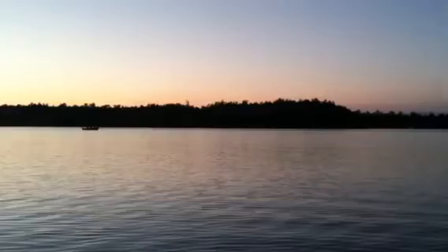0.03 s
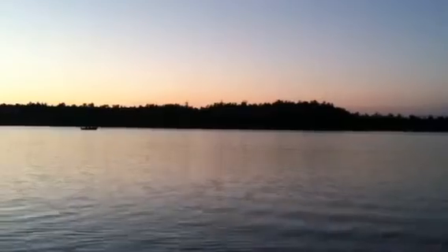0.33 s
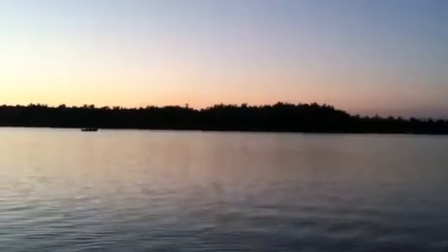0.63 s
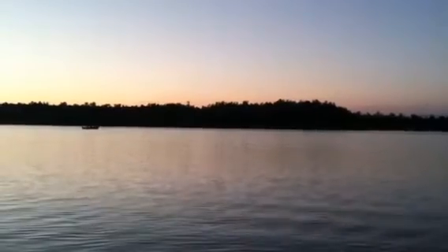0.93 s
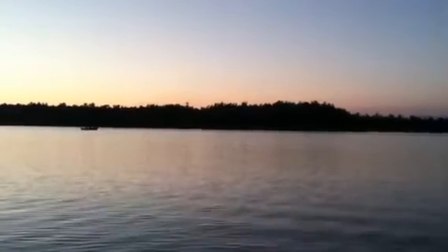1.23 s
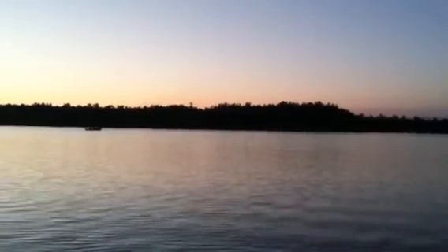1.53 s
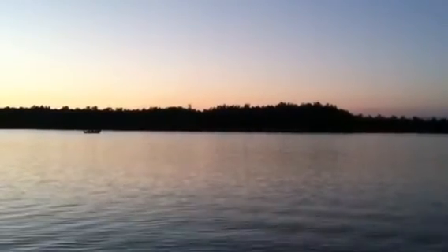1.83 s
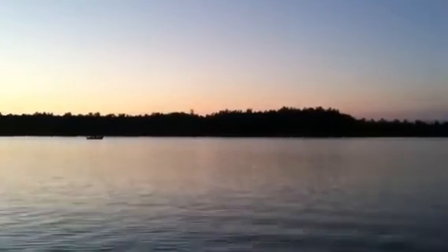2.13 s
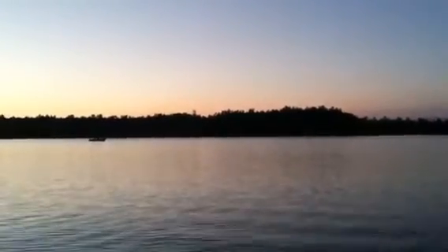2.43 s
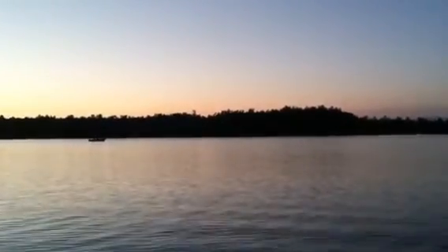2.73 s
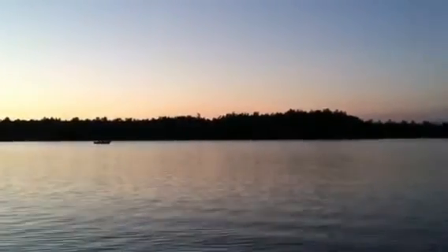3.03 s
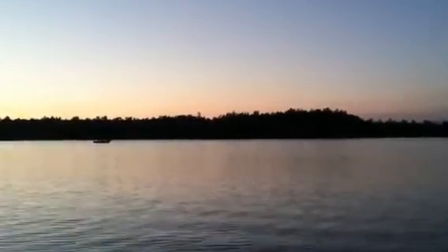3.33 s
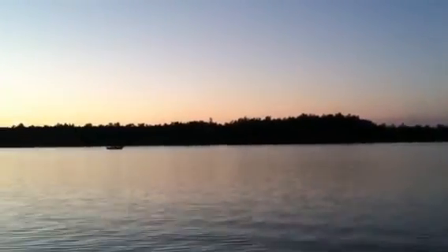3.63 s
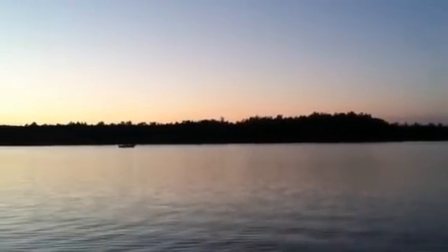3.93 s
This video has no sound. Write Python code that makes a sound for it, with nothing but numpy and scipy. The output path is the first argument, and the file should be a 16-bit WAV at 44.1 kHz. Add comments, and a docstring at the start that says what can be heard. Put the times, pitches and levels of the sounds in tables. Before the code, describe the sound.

Loons cry almost without pause across still water, their clear, quavering notes stepping up in pitch and trailing a faint echo. The lakeside is otherwise quiet, with light hiss and one sharp, close click late on.

```python
"""Loons on a lake at dusk

Two loons trade trembling calls across calm water, fainter loons answer from farther off, and the wooded shore
returns a long, faint echo. Each voice is a nearly pure tone that swings in pitch and loudness about ten times a
second and jumps between registers (pitch ranges). Under them lie a soft hiss, a low hum and two dull bumps.
Something small clicks close by, faintly at the start and clearly near the end."""
import sys
import numpy as np
from scipy import signal
from scipy.fft import rfft, irfft
from scipy.io import wavfile
from scipy.ndimage import uniform_filter1d

SR = 44100
rng = np.random.default_rng(int(sys.argv[2]) if len(sys.argv) > 2 else 0)


def unload_wav(signal):
    """Save mono or channel-first audio to the path in sys.argv[1] as 16-bit WAV at rate SR, clipped to [-1, 1]."""
    wavfile.write(
        sys.argv[1],
        SR,
        np.round(np.clip(np.atleast_2d(signal).T, -1, 1) * 32767).astype(np.int16),
    )


N = 176400  # 4 seconds


def amp(db):
    """Turns decibels into a number to multiply by."""
    return 10 ** (np.asarray(db) / 20)


def unit(x):
    """Scales a signal to an average (rms) size of 1."""
    return x / np.sqrt(np.mean(x ** 2) + 1e-20)


def look_up(table, hz):
    """Reads between the rows of a table, on a log-frequency scale."""
    f, value = np.transpose(table)
    return np.interp(np.log(hz + 1), np.log(f), value)


def add(mix, start_s, sound):
    """Adds a sound to the mix at the given time."""
    part = mix[max(round(start_s * SR), 0):][:len(sound)]
    part += sound[:len(part)]


def decay(t, fade_s):
    """Dies away by 60 dB in the fade time."""
    return np.exp(-np.log(1000) * t / fade_s)


def noise(centre_hz, width_hz):
    """Noise in one smooth band; centred on zero, it is a random wander."""
    f = np.fft.rfftfreq(N, 1 / SR)
    band = np.exp(-2 * ((f - centre_hz) / width_hz) ** 2)
    return unit(irfft(rfft(rng.standard_normal(N)) * band, N))


# The hiss of still air, from low to high: f/Hz, relative level/dB
HISS_COLOUR = [(25, -14.5), (65, -17), (100, -5.5), (170, 1), (260, 0.5), (500, -2), (900, -1), (2000, -9),
               (3500, -11.5), (6000, -13), (8500, -18), (11000, -23), (15500, -27.5)]
HISS_DB, PATCH_DB = -69.5, 1.5
def air_hiss():
    """Still air hisses softly, with slightly louder and quieter patches drifting through it."""
    hz, _, spectrum = signal.stft(rng.standard_normal(N), SR, nperseg=1024, noverlap=768)
    patches = rng.standard_normal(spectrum.shape)
    for axis in (0, 1):  # smooth over frequency, then time
        patches = uniform_filter1d(patches, size=12, axis=axis)
    gain = amp(look_up(HISS_COLOUR, hz)[:, None] + PATCH_DB * unit(patches))
    _, hiss = signal.istft(spectrum * gain, SR, nperseg=1024, noverlap=768)
    return amp(HISS_DB) * unit(hiss[:N])


# The two tones of the hum: f/Hz, level/dB
HUM_TONES = [(96.7, -80.5), (145, -81.5)]
HUM_WAVER_DB = 1.2
def low_hum():
    """Two low tones waver a little in loudness and pitch."""
    out, t = np.zeros(N), np.arange(N) / SR
    for hz, db in HUM_TONES:
        level = amp(db + HUM_WAVER_DB * noise(0, width_hz=5))
        drift = .3 * noise(0, width_hz=3)
        out += np.sqrt(2) * level * np.sin(2 * np.pi * hz * t + drift)
    return out


# One row per stretch of voice in one register; a crest is the top of a swing:
# start t/s, end t/s, crest t/s, beat length t/s, crest f/Hz, swing f/Hz,
# crest level/dB, swing level/dB, overtone boost level/dB
CALLS = [ (.12, .14, .125, .1, 1040, 60, -52, -2, 6), (.14, .22, .153, .125, 1150, 190, -46.5, 13.5, 4),
         (.25, .305, .28, .12, 1210, 60, -66.5, 5.5, -7), (.305, .357, .31, .11, 785, 70, -54.5, 5.5, -1.5),
         (.358, .385, .4, .075, 950, 210, -51.5, 5, -8.5), (.387, .545, .408, .096, 1248, 270, -39, 17, -2),
         (.545, 1.04, .599, .095, 1520, 250, -42.2, 10.5, -4),
         (.93, .958, .972, .1, 860, 220, -49, 10, 11.5),
         (.958, 1.005, .955, .1, 1200, 130, -39.5, 10.5, 0.5),
         (1.005, 1.06, 1.075, .14, 1340, 270, -38, 9, 4), (1.055, 1.118, 1.09, .1, 1330, 100, -52, 4, -14),
         (1.062, 1.103, 1.067, .1, 1765, 220, -48, 21, 10),
         (1.115, 1.14, 1.155, .1, 1560, 330, -41.5, 1, -3.5),
         (1.125, 1.147, 1.12, .08, 740, 120, -62, 5.5, -14.5),
         (1.141, 1.385, 1.156, .092, 1775, 220, -44, 18.5, 5),
         (1.392, 1.43, 1.44, .1, 1530, 310, -40.5, 7, -4.5),
         (1.432, 1.474, 1.438, .1, 1755, 220, -49.5, 19, 12.5),
         (1.476, 1.505, 1.49, .1, 1170, 80, -50, 1.5, -12),
         (1.5, 1.573, 1.53, .12, 1005, 100, -50, 7, -3.5),
         (1.724, 1.763, 1.765, .1, 860, 90, -52.5, 4, 8.5),
         (1.765, 1.79, 1.745, .09, 1200, 190, -46, 6, -6.5),
         (1.79, 1.883, 1.836, .1, 1245, 240, -38, 19.5, -3),
         (1.885, 2.46, 1.932, .0925, 1532, 230, -39.7, 12, -4),
         (2.1, 2.22, 2.135, .1, 800, 80, -70, 7, -16.5), (2.25, 2.35, 2.33, .1, 1230, 230, -61.5, 6, -5),
         (2.35, 2.378, 2.39, .1, 830, 210, -49.5, 10.5, 9.5),
         (2.378, 2.425, 2.37, .1, 1190, 100, -40, 10, 1),
         (2.425, 2.527, 2.48, .097, 1500, 280, -40.5, 9, -5),
         (2.527, 2.572, 2.574, .096, 1530, 310, -40, 5, -5),
         (2.455, 2.51, 2.47, .13, 1235, 200, -54, 2, -3.5),
         (2.483, 2.508, 2.465, .08, 830, 190, -57.5, 4.5, -3.5),
         (2.574, 2.72, 2.582, .094, 1775, 200, -44.5, 19.5, 8.5),
         (2.729, 2.76, 2.766, .1, 1490, 290, -41, 3, -3),
         (2.762, 2.815, 2.769, .1, 1770, 220, -46.5, 19, 9.5),
         (2.821, 2.887, 2.869, .096, 1450, 260, -42, 7, -5),
         (2.877, 2.905, 2.88, .1, 1700, 150, -56.5, 3, 14),
         (2.912, 2.938, 2.915, .1, 1180, 60, -52, 8, -20.5),
         (2.938, 3.02, 2.97, .125, 990, 100, -48.5, 12, -5.5),
         (3.194, 3.224, 3.195, .1, 755, 60, -55, -0.5, -4),
         (3.23, 3.325, 3.278, .098, 1245, 260, -38.7, 18.5, -3),
         (3.325, 3.419, 3.373, .1, 1268, 260, -37.7, 14, -4),
         (3.42, 3.91, 3.467, .093, 1522, 220, -44.5, 8, 2), (3.595, 3.7, 3.7, .13, 800, 130, -68, 7, -8),
         (3.72, 3.88, 3.805, .098, 1270, 280, -62.5, 2, -4), (3.876, 3.911, 3.92, .11, 830, 200, -51, 6, 7),
         (3.912, 4.02, 4.005, .105, 1230, 250, -41, 9.5, 1.5),
         (3.915, 3.99, 3.96, .1, 1300, 80, -52.5, 5.5, 2)]
# How flat the loudness stays on a crest: crest f/Hz, flatness (bigger is flatter)
CREST_FLATNESS = [(1000, 1.2), (1250, 1.55), (1500, 1.1), (1780, 1.55)]
# How well the throat's resonances pass an overtone: f/Hz, relative level/dB
THROAT_COLOUR = [(1300, -3.5), (1650, -6.5), (1980, -25.5), (2280, -19.5), (2500, -33), (3040, -34.5),
                 (3540, -30.5), (3800, -39), (4500, -30.5), (5300, -33), (7000, -37), (9000, -42.5)]
SLOWING_PER_S = .095  # a long call beats more and more slowly
SAG_HZ, SAG_DB, SAG_S = 55, 3, .41  # and sinks, ever faster: this far, this long after its crest time
ATTACK_S, RELEASE_S = .009, .011  # a register starts abruptly and fades at the next jump
ARCH_SHAPE, LEAD_S = 1.22, .002  # pitch lingers on the crest; loudness runs slightly ahead of it
JITTER, SHIMMER_DB, WOBBLE_HZ = .004, .51, 250  # tiny random wobbles of pitch and loudness
OVERTONE_STEP_DB, FLUTTER_DB, FLUTTER_HZ = -6, 3, 90  # overtones weaken going up, and flicker
def loons():
    """Pitch and loudness rise and fall together on each beat; the throat passes a few weak overtones."""
    out = np.zeros(N + SR)
    jitter, shimmer = JITTER * noise(0, WOBBLE_HZ), SHIMMER_DB * noise(0, WOBBLE_HZ)
    flutter = FLUTTER_DB * np.array([noise(0, FLUTTER_HZ) for _ in range(5)])
    for start, end, crest, beat, top_hz, swing_hz, top_db, swing_db, boost_db in CALLS:
        samples = np.arange(round((start - ATTACK_S / 2) * SR), round((end + RELEASE_S / 2) * SR))
        t, at = samples / SR, samples % N
        age = t - crest
        pace = np.pi * (1 - SLOWING_PER_S * age) / beat
        pitch_dip = (np.sin(pace * age) ** 2) ** ARCH_SHAPE
        level_dip = (np.sin(pace * (age + LEAD_S)) ** 2) ** look_up(CREST_FLATNESS, top_hz)
        sag = (age / SAG_S) ** 3
        hz = (top_hz - swing_hz * pitch_dip - SAG_HZ * sag) * (1 + jitter[at])
        phase = 2 * np.pi * np.cumsum(hz) / SR
        voice = np.sin(phase)
        for k, flutter_db in enumerate(flutter[:, at], 2):
            overtone_db = look_up(THROAT_COLOUR, k * hz) + boost_db + OVERTONE_STEP_DB * (k - 2)
            voice += amp(overtone_db + flutter_db) * np.sin(k * phase)
        ramp = np.minimum((t - t[0]) / ATTACK_S, (t[-1] - t) / RELEASE_S)
        fade = np.sin(np.pi / 2 * np.clip(ramp, 0, 1)) ** 2
        level = amp(top_db - swing_db * level_dip - SAG_DB * sag + shimmer[at])
        add(out, t[0], np.sqrt(2) * fade * level * voice)
    return out[:N]


# Echoes from the water, the near bank and the far shore: delay t/s, build-up t/s, fade t/s, level/dB
LAKE_ECHOES = [(.002, .004, .12, -25), (.03, .08, 1.3, -22), (.68, .1, 1.9, -18)]
# How much of each frequency comes back: f/Hz, relative level/dB
ECHO_TONE = [(500, -5), (1000, -2), (1250, 0), (1520, -1), (1780, -10), (3000, -12), (8000, -22)]
def lake_echo(calls):
    """Blurred echoes return from the water and the wooded banks, dulled by distance."""
    t = np.arange(3 * SR) / SR
    tail = np.zeros(len(t))
    for delay, build, fade_s, db in LAKE_ECHOES:
        swell = np.clip((t - delay) / build, 0, 1)
        echo = rng.standard_normal(len(t)) * swell * decay(t, fade_s)
        tail += amp(db) * echo / np.linalg.norm(echo)
    colour = amp(look_up(ECHO_TONE, np.fft.rfftfreq(len(t), 1 / SR)))
    tail = irfft(rfft(tail) * colour, len(t))
    return signal.fftconvolve(calls, tail[:-SR // 2])[:N]


# When each click comes and how strong it is: t/s, level/dB
CLICK_HITS = [(.139, -65.5), (3.8408, -39.5)]
# The noisy part of a click, from low to high: f/Hz, relative level/dB
SNAP_COLOUR = [(500, -22), (2000, -3), (3500, -9.5), (5000, 1), (6500, -5), (8800, -1), (10500, -4),
               (13000, -19), (15500, -29)]
# The tones the object rings with: f/Hz, relative level/dB, fade t/s
RING_TONES = [(4253, 14, 0.067), (7149, -15, 0.082), (7677, -7, 0.076), (8129, -11, 0.17),
              (8576, -19, 0.091), (8888, -4, 0.049), (9690, -19, 0.1), (10020, -9, 0.092),
              (10980, -23, 0.12), (11460, -24, 0.067)]
SNAP_FADE_S, RATTLE_FADE_S, TAIL_FADE_S = .009, .065, .3
RATTLE_DB, TAIL_DB, RING_DB = -10, -39.5, -31.5  # compared with the snap
def clicks():
    """A small hard object snaps, rattles and rings briefly."""
    out, t = np.zeros(N), np.arange(SR // 2) / SR
    colour = amp(look_up(SNAP_COLOUR, np.fft.rfftfreq(len(t), 1 / SR)))
    rattle = amp(RATTLE_DB) * decay(t, RATTLE_FADE_S)
    shape = decay(t, SNAP_FADE_S) + rattle + amp(TAIL_DB) * decay(t, TAIL_FADE_S)
    ring = sum(amp(db) * decay(t, fade_s) * np.sin(2 * np.pi * hz * t) for hz, db, fade_s in RING_TONES)
    for start, db in CLICK_HITS:
        burst = unit(irfft(rfft(rng.standard_normal(len(t))) * colour, len(t)))
        add(out, start, amp(db) * (burst * shape + amp(RING_DB) * ring))
    return out


# Two bands of noise for each bump: middle t/s, half length t/s, centre f/Hz, width f/Hz, level/dB
BUMP_BANDS = [(1.185, .028, 105, 25, -67), (1.22, .08, 175, 90, -75), (1.56, .022, 200, 130, -71),
              (1.56, .022, 450, 70, -76)]
def bumps():
    """Low noise swells and fades quickly, making dull, soft-edged bumps."""
    t = np.arange(N) / SR
    return sum(amp(db) * np.exp(-((t - middle) / half) ** 2) * noise(hz, width)
               for middle, half, hz, width, db in BUMP_BANDS)


def scene():
    """The birds and their echo over the quiet lakeside, in one channel."""
    calls = loons()
    return (calls + lake_echo(calls) + air_hiss() + low_hum() + clicks() + bumps())[None]


START_S, CUT_HZ = .12, 15700
def record(dry):
    """The sound begins after a moment of silence, and the highest treble is cut off."""
    live = dry * (np.arange(N) >= START_S * SR)
    low_pass = signal.firwin(511, CUT_HZ, window=("kaiser", 9), fs=SR)
    return signal.oaconvolve(live, low_pass[None], "same")


dry = scene()
out = record(dry)
unload_wav(out)
```